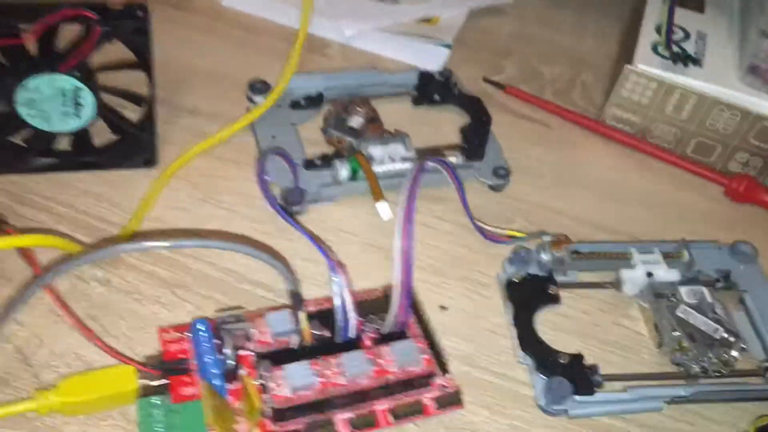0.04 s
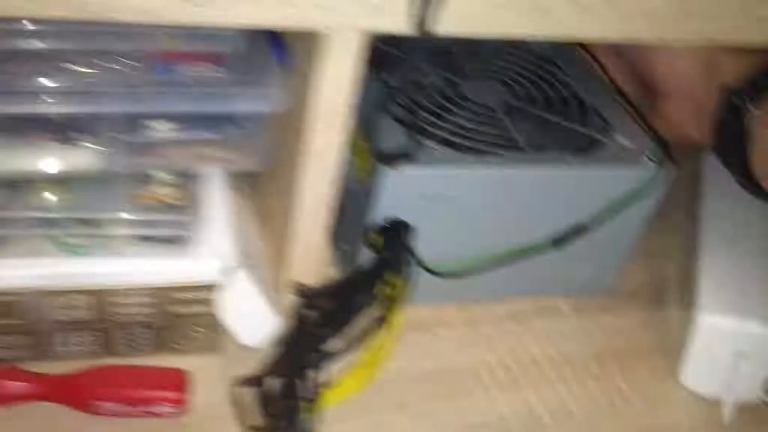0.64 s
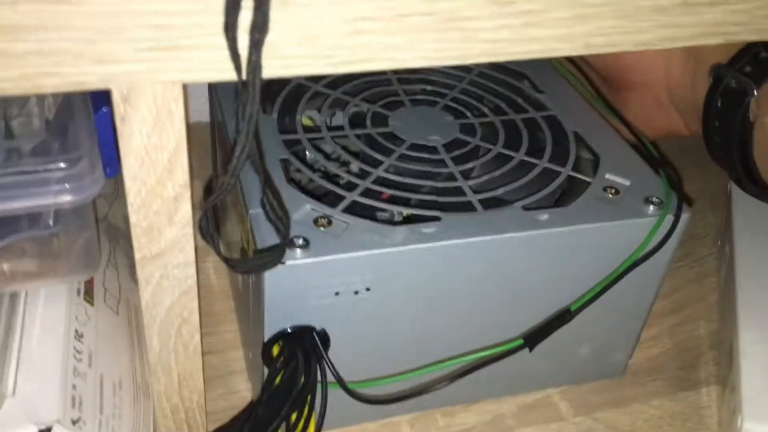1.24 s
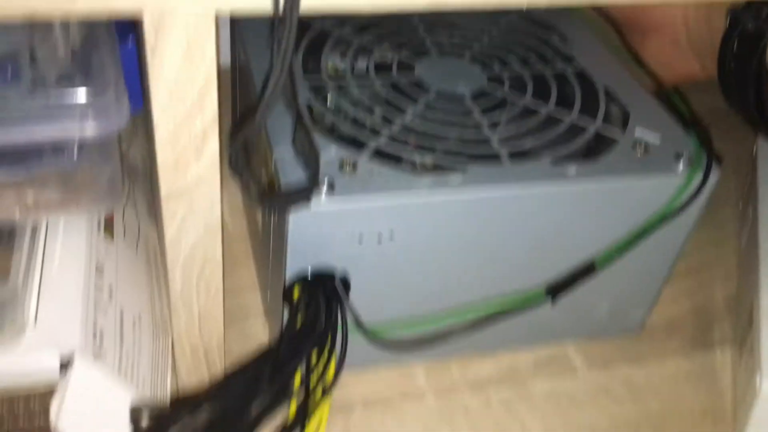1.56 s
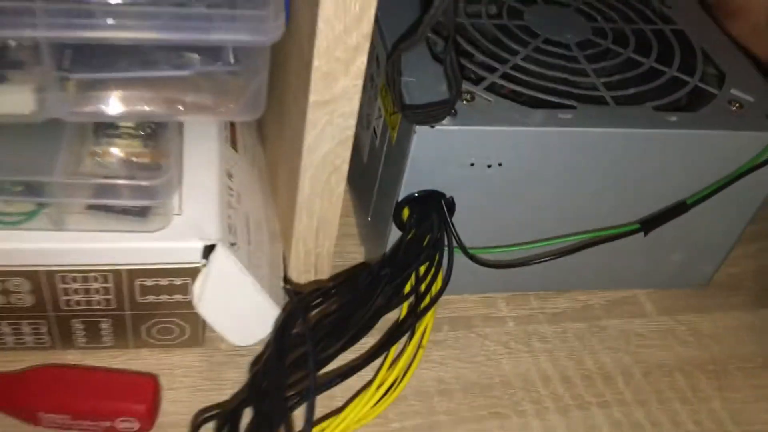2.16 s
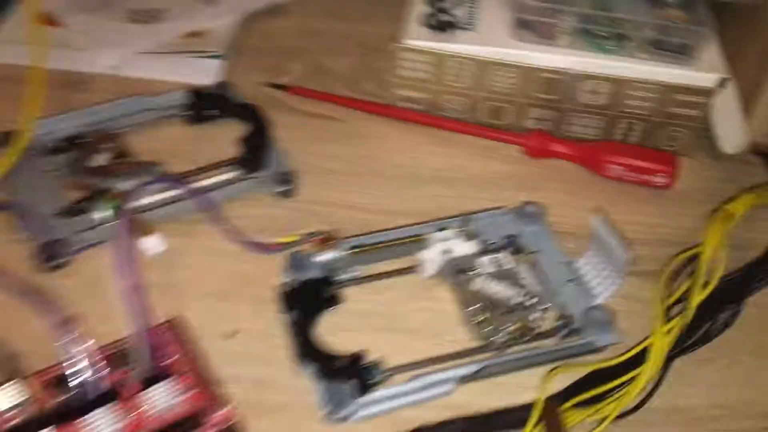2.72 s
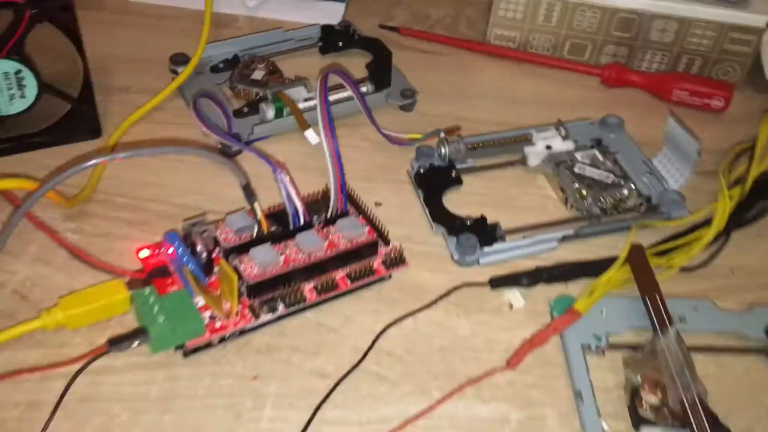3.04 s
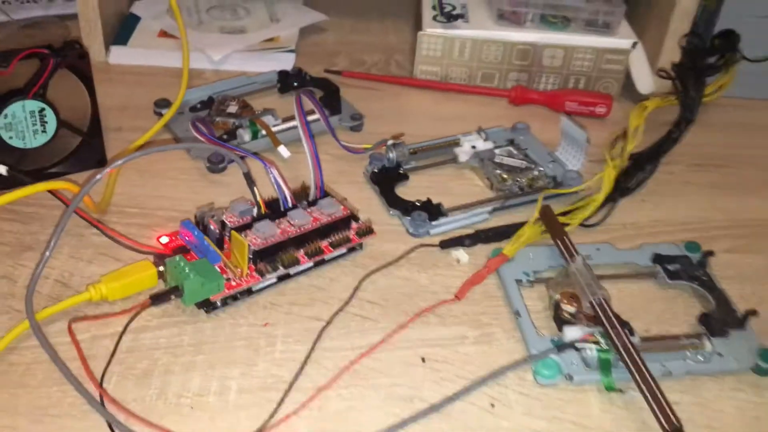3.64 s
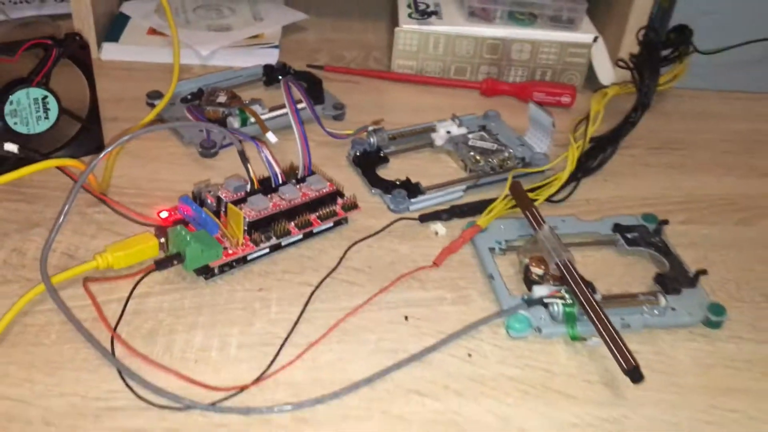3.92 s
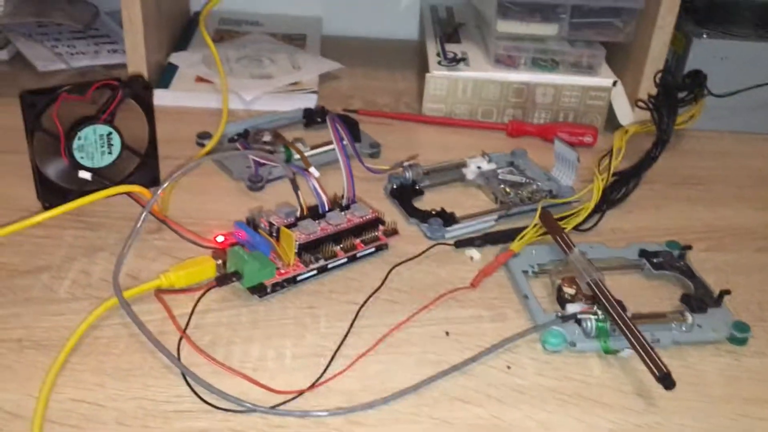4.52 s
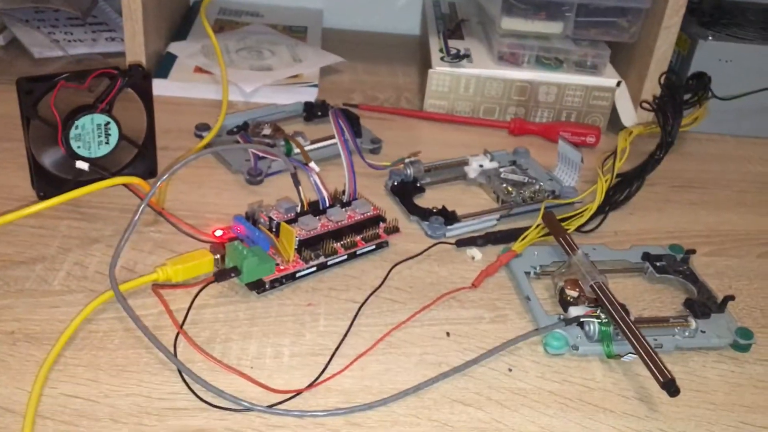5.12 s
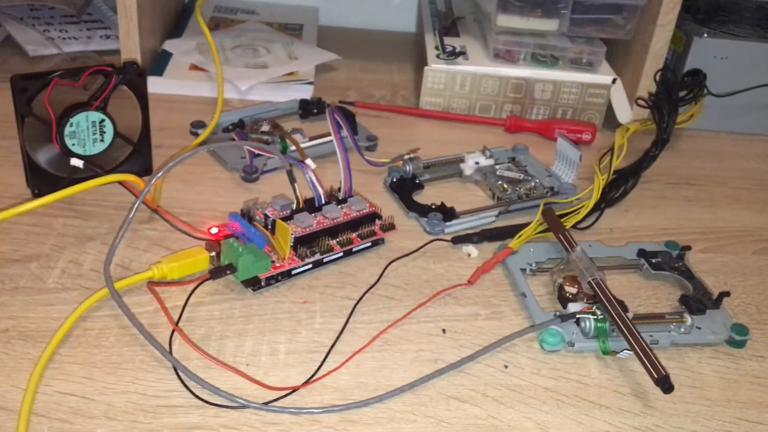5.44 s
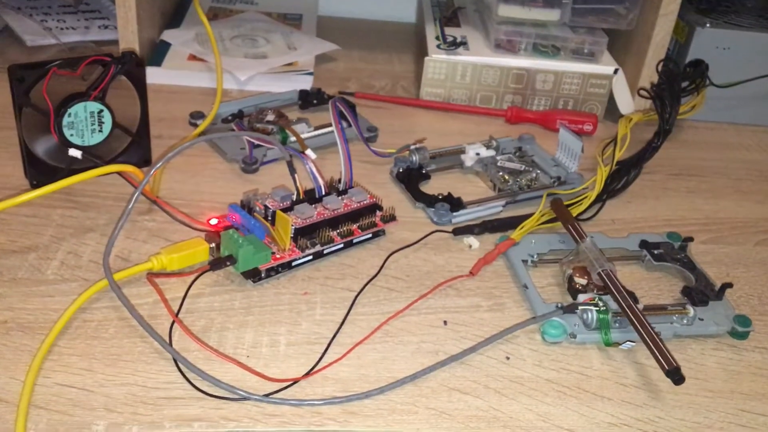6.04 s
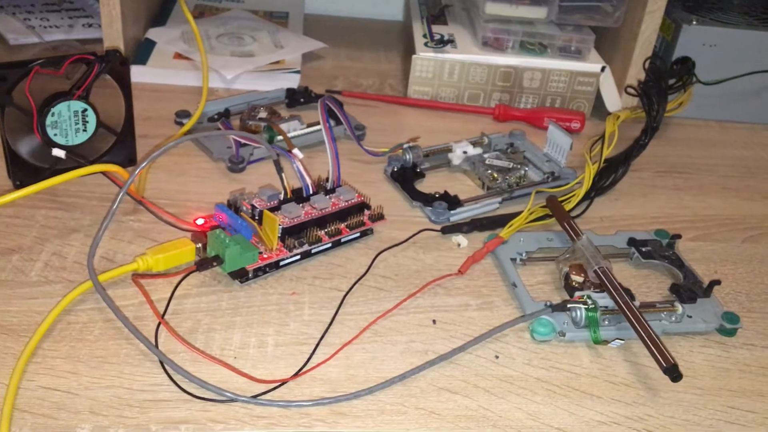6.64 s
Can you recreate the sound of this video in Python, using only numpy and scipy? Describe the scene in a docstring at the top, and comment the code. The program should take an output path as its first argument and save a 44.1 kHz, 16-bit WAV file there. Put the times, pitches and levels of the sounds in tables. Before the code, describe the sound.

On a wooden workbench in a small room, a hand softly brushes and taps around a power supply, then snaps its rocker switch on. A cooling fan spins up with a faint high electronic whine. A small disc drive motor drones briefly, then stalls, rattling its steel frame in rapid, even pulses for about two seconds. It ends in a quiet hum under the fan, heard from a close hand-held microphone.

```python
"""A wooden workbench in a small room, heard from a hand-held microphone. A hand brushes and taps around
a computer power supply, then snaps its rocker switch on. A cooling fan spins up and the stepper drivers
whine. The sled of a disc drive runs into its end stop: its stalled motor winds up and snaps back about
14 times a second, rattling the steel frame, then runs on quietly."""
import sys
import numpy as np
from scipy import signal
from scipy.fft import rfft, irfft, next_fast_len
from scipy.io import wavfile

SR = 44100
rng = np.random.default_rng(int(sys.argv[2]) if len(sys.argv) > 2 else 0)


def pcm_store(signal):
    """Save signal as 16-bit PCM."""
    levels = np.round(np.clip(np.atleast_2d(signal), -1, 1) * 32767)
    wavfile.write(sys.argv[1], SR, levels.astype(np.int16).T)


N = 298557
TIME = np.arange(N) / SR
POWER_ON_S, STEPPING_S, STALL_S, FREE_S = 1.956, 2.36, 3.08, 5.28


def from_db(db):
    """Decibels to gain."""
    return np.exp(np.asarray(db) * (np.log(10) / 20))


def rms_one(x):
    """Scale to rms 1."""
    return x / np.sqrt(np.mean(x ** 2) + 1e-20)


def at_hz(table, hz):
    """Read a table on a log-frequency axis."""
    table_hz, values = np.transpose(table)
    return np.interp(np.log(hz + 1e-9), np.log(table_hz), values)


def between(start_s, end_s, fade_s=0.016):
    """Gate with linear fades."""
    return np.clip((TIME - start_s) / fade_s, 0, 1) * np.clip((end_s - TIME) / fade_s, 0, 1)


def band(x, low_hz, high_hz, order=2):
    """Butterworth band-pass."""
    return signal.sosfilt(signal.butter(order, [low_hz, high_hz], "band", fs=SR, output="sos"), x)


def coloured(x, spectrum):
    """Filter by a table of f/Hz, level/dB."""
    size = next_fast_len(N)
    gain = from_db(at_hz(spectrum, np.fft.rfftfreq(size, 1 / SR)))
    return irfft(rfft(x, size) * gain, size)[:N]


def noise(spectrum):
    """Coloured noise, rms 1."""
    return rms_one(coloured(rng.standard_normal(N), spectrum))


def band_noise(low_hz, high_hz, order=2):
    """Band-passed noise, rms 1."""
    return rms_one(band(rng.standard_normal(N), low_hz, high_hz, order))


def drift(knots_per_s):
    """Random wander, rms 1."""
    knots = rng.standard_normal(2048)
    return rms_one(np.interp(TIME * knots_per_s, np.arange(len(knots)), knots))


def clicks(times_s, gains):
    """One impulse per event."""
    out = np.zeros(N)
    out[np.round(np.asarray(times_s) * SR).astype(int)] = gains
    return out


def convolve(x, response):
    """Play a response at every impulse."""
    return signal.oaconvolve(x, response)[:N]


def ring(x, hz, t60_s):
    """Damped mode: a unit click starts a sine of height 1."""
    radius, angle = from_db(-60 / (t60_s * SR)), 2 * np.pi * hz / SR
    return signal.lfilter([0, np.sin(angle)], [1, -2 * radius * np.cos(angle), radius ** 2], x + 1e-18)


def resonance(x, hz, width_hz):
    """Resonator with peak gain 1."""
    radius, angle = np.exp(-np.pi * width_hz / SR), 2 * np.pi * hz / SR
    gain = (1 - radius ** 2) / 2
    return signal.lfilter([gain, 0, -gain], [1, -2 * radius * np.cos(angle), radius ** 2], x + 1e-18)


def decay(t60_s):
    """Half a second of exponential decay."""
    return np.exp(-np.log(1000) * TIME[:SR // 2] / t60_s)


def nearness(leave_s=3.06, move_s=0.45):
    """Microphone position: 1 at the supply, 0 over the middle of the bench."""
    return np.clip(1 - (TIME - leave_s) / move_s, 0, 1)


# room decay: f/Hz, t60/s
ROOM_DECAY = [(150, 0.81), (1000, 0.38), (4000, 0.29), (14000, 0.17)]

def room(x, wall_hz, build_s=0.002):
    """Diffuse reflections, dying by octave and low-passed by the walls."""
    tail = 0
    for hz in np.geomspace(100, 12800, 8):
        octave = band(rng.standard_normal(SR // 2), hz / np.sqrt(2), hz * np.sqrt(2))
        tail += octave * decay(at_hz(ROOM_DECAY, hz))
    tail *= 1 - np.exp(-TIME[:SR // 2] / build_s)
    reflections = convolve(x, tail / np.sqrt(np.sum(tail ** 2)))
    pole = np.exp(-2 * np.pi * wall_hz / SR)
    return signal.lfilter([1 - pole], [1, -pole], reflections)


# still air: f/Hz, relative density/dB
ROOM_AIR = [(20, -16), (100, -9), (155, -1), (220, -13.5), (400, -12.5), (700, -15), (1100, -15),
            (1700, -18.5), (3000, -24.5), (6000, -30.5), (9000, -31.5), (15000, -35)]

def room_air(level_db=-66.5):
    """Steady, quiet air of the room."""
    return from_db(level_db) * noise(ROOM_AIR)


# grip shifts: t/s, length/s, level/dB
GRIP_SHIFTS = [(0.0, 0.087, -63), (0.188, 0.29, -63), (1.96, 0.12, -53.5)]

def grip_rumble(rest_db=-68, unsteady_db=1.0):
    """The hand rumbles on the microphone, louder when the grip shifts."""
    resting = from_db(rest_db + unsteady_db * drift(3))
    shifts = sum(from_db(db) * between(t, t + length_s, fade_s=0.04) for t, length_s, db in GRIP_SHIFTS)
    return (resting + shifts) * band_noise(52, 80)


# strokes along the supply: t/s, length/s, hiss/dB, case ring/dB
BRUSH_STROKES = [(0.0, 0.15, -74.5, -81), (0.391, 0.078, -72, -68), (0.463, 0.17, -88, -72.5),
                 (0.615, 0.27, -76, -70.5), (0.863, 0.14, -71, -68), (1.29, 0.11, -74, -78),
                 (1.746, 0.077, -69.5, -76), (2.823, 0.14, -73, -74)]

def brushes(grain_db=2.0):
    """Skin and sleeve slide over the steel case: uneven hiss and a ring."""
    hiss = band_noise(1780, 11700, order=1)
    case = rms_one(resonance(rng.standard_normal(N), hz=1120, width_hz=170))
    strokes = 0
    for t, length_s, hiss_db, ring_db in BRUSH_STROKES:
        friction = from_db(hiss_db) * hiss + from_db(ring_db) * case
        strokes += friction * between(t, t + length_s, fade_s=0.022)
    return strokes * from_db(grain_db * drift(90))


# knocks: t/s, level/dB, bass offset/dB, treble offset/dB
TAPS = [(0.034, -57.5, -2, -18), (0.279, -51.5, -4.5, -40), (0.347, -49, -25, -20),
        (1.492, -47.5, -19, -24), (1.596, -49, -10, -19), (1.79, -52, -17.5, -15.5),
        (2.164, -34, -17.5, -15), (2.458, -37, -8, -24), (2.477, -60.5, -20, 3)]

def taps(wood_db=-6, body_db=-7, bright_db=1, room_db=-5):
    """Hand and cables knock dully on wood and plastic; the bass rings longest."""
    times_s, db, bass_db, treble_db = np.transpose(TAPS)

    def register(level_db, low_hz, high_hz, t60_s):
        """One noise band of every knock."""
        return band_noise(low_hz, high_hz) * convolve(clicks(times_s, from_db(level_db)), decay(t60_s))

    softness_db = 0.4 * (db.mean() - db)   # soft touches sound mostly in the wood
    knocks = (register(db + bass_db, 130, 520, t60_s=0.14)
              + register(db + wood_db + softness_db, 892, 1246, t60_s=0.045)
              + register(db + body_db, 1340, 3300, t60_s=0.035)
              + register(db + treble_db + bright_db, 3020, 10000, t60_s=0.048))
    return knocks + from_db(room_db) * room(knocks, wall_hz=3790)


# rocker unseats, snaps over, bounces: t/s, level/dB
ROCKER_HITS = [(1.9484, -36), (1.9541, 0.5), (1.956, 0)]
# rocker crack: f/Hz, relative density/dB
ROCKER_SPECTRUM = [(150, -20.5), (600, -7), (1100, -2), (1600, 0), (2300, -10), (3000, -1), (4000, -11.5),
                   (5400, -3.5), (8200, -7), (12000, -9), (15500, -9)]
# steel case of the supply: f/Hz, level/dB, t60/s
CASE_MODES = [(128, -40, .2), (188.4, -26, 0.12), (340, -27, 0.095), (441, -26.5, 0.13), (524, -23.5, 0.05),
              (606, -20.5, 0.059), (970, -25.5, 0.14), (1088, -23.5, 0.091), (1206, -29, .1),
              (3000, -28, .04), (3150, -30, 0.05), (5294, -29.5, 0.04), (9030, -19, .03)]

def switch(crack_db=-18.5, case_lag_s=0.002, shelf_db=-38, crack_room_db=-14, case_room_db=-20):
    """The rocker cracks over, rings the case and shakes the shelf under it."""
    times_s, hit_db = np.transpose(ROCKER_HITS)
    envelope = convolve(clicks(times_s, from_db(hit_db)), decay(t60_s=0.04))
    crack = from_db(crack_db) * noise(ROCKER_SPECTRUM) * envelope
    blow = clicks([times_s[np.argmax(hit_db)] + case_lag_s], 1)
    case = sum((-1) ** k * from_db(db) * ring(blow, hz, t60_s)
               for k, (hz, db, t60_s) in enumerate(CASE_MODES))
    shelf = from_db(shelf_db) * band_noise(75, 220.6) * convolve(blow, decay(t60_s=0.45))
    send = from_db(crack_room_db) * crack + from_db(case_room_db) * case
    return crack + case + shelf + room(send, wall_hz=6000)


# blade tones: multiple of blade rate, level/dB
FAN_HARMONICS = [(1, -72.5), (2, -72), (3, -69.5), (4, -75.5)]
# rushing air: f/Hz, relative density/dB
FAN_AIR = [(70, -24.5), (150, -11), (250, 3), (400, -10), (800, -8.5), (1100, -5), (1650, -6), (2050, -11),
           (2400, -18), (4000, -25.5), (6500, -26), (7500, -37.5), (9200, -29), (15000, -51)]

def fan(blade_hz=471, spin_up_s=0.44, waver=0.00299, flutter_db=2.5, tone_db=-1.5, air_db=-57.5):
    """The fan runs up: blade tones over air that grows louder and brighter with speed."""
    speed = 1 - np.exp(-np.maximum(TIME - POWER_ON_S, 0) / spin_up_s)
    phase = 2 * np.pi * np.cumsum(blade_hz * speed * (1 + waver * drift(6.8))) / SR
    tones = sum(from_db(db + flutter_db * drift(36)) * np.sin(k * phase) for k, db in FAN_HARMONICS)
    tone_gain = np.sqrt(2) * speed ** 2 * from_db(tone_db + 4.5 * nearness())
    air = noise(FAN_AIR)
    low_air = signal.sosfiltfilt(signal.butter(3, 1250, fs=SR, output="sos"), air)
    high_air = (air - low_air) * speed ** 6.2
    air_gain = speed ** 1.5 * from_db(air_db + 4 * nearness())
    return tone_gain * tones + air_gain * (low_air + high_air)


def drivers(whine_hz=15600, whine_db=-70.5, hiss_db=-64):
    """The current choppers whine from power-on; they also hiss until stepping starts."""
    whine = rng.standard_normal(N)
    for _ in range(2):
        whine = resonance(whine, whine_hz, width_hz=260)
    whine = rms_one(whine) * (TIME > POWER_ON_S)
    hiss = band_noise(1500, 11000) * between(POWER_ON_S, STEPPING_S, fade_s=0.005)
    return from_db(whine_db) * whine + from_db(hiss_db) * hiss


def hum(lines, flutter_db, wobble_rad):
    """Motor tones (f/Hz, level/dB) that waver together in level and phase."""
    sway = wobble_rad * drift(28)
    tones = sum(from_db(db) * np.sin(2 * np.pi * hz * TIME + sway) for hz, db in lines)
    return np.sqrt(2) * tones * from_db(flutter_db * drift(13))


# motor whistles: f/Hz, level/dB
TRAVEL_WHISTLES = [(1077, -78), (4339, -87), (5206, -89), (7806, -86.5)]

def sled_travel(drone_hz=264, drone_db=-58, swell_s=0.307, beat_hz=3.4, beat_db=5, fade_db_per_s=6):
    """Smooth stepping moves the sled: the frame drones with a slow beat, thin whistles fade."""
    age_s = np.maximum(TIME - STEPPING_S, 0)
    swell = np.minimum(age_s / swell_s, 1)
    beat = from_db(beat_db * np.cos(2 * np.pi * beat_hz * age_s))
    drone = hum([(drone_hz, drone_db)], flutter_db=0.5, wobble_rad=1.0) * swell * beat
    whistles = hum(TRAVEL_WHISTLES, flutter_db=2.5, wobble_rad=0.53) * from_db(-fade_db_per_s * age_s)
    return (drone + whistles) * between(STEPPING_S, STALL_S)


def slip_times(start_s=3.0872, period_s=0.07392, quickening_s=1.08e-5, first_early_s=0.0023, count=30):
    """The stalled rotor snaps back at an even pace that quickens very slightly."""
    k = np.arange(count)
    return start_s + k * (period_s - quickening_s * k / 2) - first_early_s * (k == 0)


def chatter(level_db, repeat_share, rise_s, fall_s, snap, burst=0, lead_s=0.0066, snap_s=0.0057):
    """The screw chatters ever harder until the rotor snaps; part of the pattern repeats each slip."""
    age_s = TIME[:SR // 20] - snap_s
    swell = np.exp(np.minimum(age_s / rise_s, -age_s / fall_s))
    swell += burst * np.exp(-(age_s / 0.00093 - 0.5) ** 2)   # contacts crowd just after the snap
    starts = clicks(slip_times() - lead_s, from_db(level_db))
    pattern = np.sqrt(repeat_share) * swell * rng.standard_normal(len(age_s))
    pattern[np.argmin(abs(age_s))] += snap
    fresh = np.sqrt(1 - repeat_share) * rng.standard_normal(N) * convolve(starts, swell)
    return convolve(starts, pattern) + fresh


# sled, rails and sheet steel: f/Hz, width/Hz, level/dB
SLED_MODES = [(542.4, 11.4, 5), (642, 68, -5), (774.6, 40.5, 2), (821.4, 15, 0), (879, 40, -3.5),
              (965.6, 27, 0), (1105, 87, -6.5), (1123, 9.8, 3), (1247, 79, -1), (1477, 34, -3),
              (1577, 107, -9), (1790, 83, -5), (2033, 93, -9), (2400, 47, -15.5), (2988, 106, -9.5),
              (3850, 280, -13.5), (4410, 270, -8.5), (5870, 620, -12.5), (6220, 260, -12.5),
              (9020, 1300, -12), (12200, 1100, -21.5)]
# dry contact ticks: f/Hz, gain/dB
TICK_SPECTRUM = [(500, 2), (1500, 6), (2500, -9.5), (4000, -3.5), (6000, 1.5), (7600, -6.5), (9200, -10.5),
                 (10600, -12), (12600, 3.5), (14000, -8), (15600, -6)]

def sled_rattle(heavy_db=-22, light_db=-22.9, tick_db=-36.4, body_room_db=-10, metal_room_db=-7,
                fade_db_per_s=1.29, dulling_db_per_s=1.5, opening_db_per_s=2.0):
    """Each slip's heavy kick rings the low modes; light metal contacts tick and ring the high ones."""
    times_s = slip_times()
    # the microphone draws back: light contacts fade, ticks fastest
    fade_db = fade_db_per_s * (times_s - times_s[0])
    tick_fade_db = fade_db + dulling_db_per_s * (times_s - times_s.mean())
    heavy = chatter(heavy_db, repeat_share=0.5, rise_s=0.003, fall_s=0.0065, snap=26)
    light = chatter(light_db - fade_db, repeat_share=0.39,
                    rise_s=0.0026, fall_s=0.01, snap=10, burst=0.34)
    ticks = chatter(tick_db - tick_fade_db, repeat_share=0.36,
                    rise_s=0.011, fall_s=0.0063, snap=2.8, burst=0.64)
    # low modes are louder beside the supply; middle ones open up as the microphone swings round
    swing_s = np.clip(TIME, times_s[0], times_s[-1]) - times_s.mean()
    low_gain = from_db(2 * nearness())
    mid_gain = from_db(opening_db_per_s * swing_s - 2.5 * nearness())
    body, metal = 0, coloured(ticks, TICK_SPECTRUM)
    for k, (hz, width_hz, db) in enumerate(SLED_MODES):
        if hz < 2600:
            gain = from_db(db) * (low_gain if hz < 1550 else mid_gain)
            body += (-1) ** k * gain * resonance(heavy, hz, width_hz)
        else:
            metal += from_db(db) * resonance(light, hz, width_hz)
    send = from_db(body_room_db) * body + from_db(metal_room_db) * metal
    return body + metal + room(send, wall_hz=6900)


# frame rocking on the bench: f/Hz, level/dB, t60/s, polarity
FRAME_MODES = [(146, -44.5, 0.29, 1), (234, -25, 0.13, 1), (255.4, -31.5, 0.18, -1),
               (318.7, -28.5, 0.07, -1), (440, -45, 0.16, -1), (507, -45.5, 0.2, 1)]

def frame_knock(lag_s=0.00096, kick_db=-0.5, room_db=-19):
    """Every slip kicks the frame; two close modes beat, so the thrum swells a second time."""
    kicks = clicks(slip_times() + lag_s, from_db(kick_db))
    thrum = sum(sign * from_db(db) * ring(kicks, hz, t60_s) for hz, db, t60_s, sign in FRAME_MODES)
    return thrum + from_db(room_db) * room(thrum, wall_hz=1970)


# free-running motor: f/Hz, level/dB
RUNNING_TONES = [(216, -71), (555, -73.5), (684, -69), (8678, -87), (12150, -92)]

def running_motor():
    """After the stall the motor steps smoothly and hums."""
    return hum(RUNNING_TONES, flutter_db=0.5, wobble_rad=0.2) * between(FREE_S, np.inf)


def scene():
    """All sources at one microphone."""
    drive = frame_knock() + sled_rattle() + sled_travel() + running_motor() + drivers()
    handling = switch() + taps() + brushes()
    return (drive + handling + fan() + grip_rumble() + room_air())[None]


def record(dry):
    """Steep elliptic low-pass at 15850 Hz."""
    return signal.sosfilt(signal.ellip(12, 0.1, 80, 15850, fs=SR, output="sos"), dry)


dry = scene()
out = record(dry)
pcm_store(out)
```